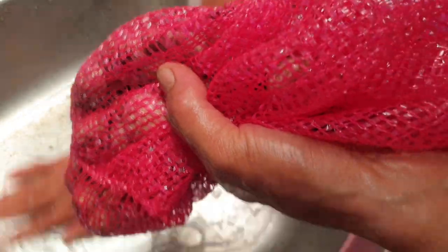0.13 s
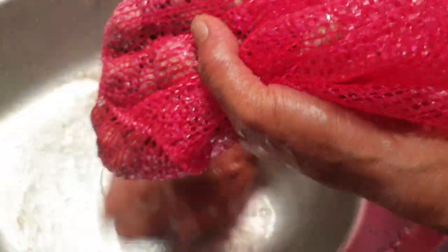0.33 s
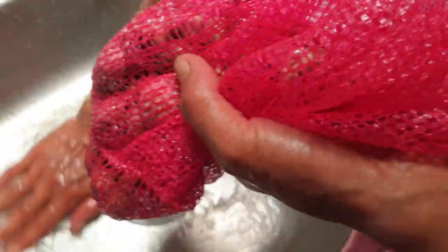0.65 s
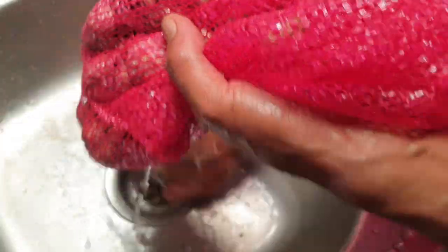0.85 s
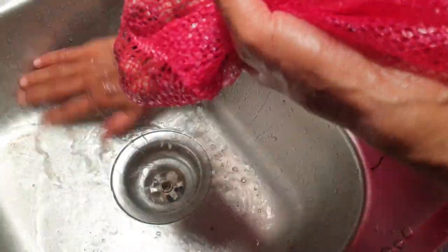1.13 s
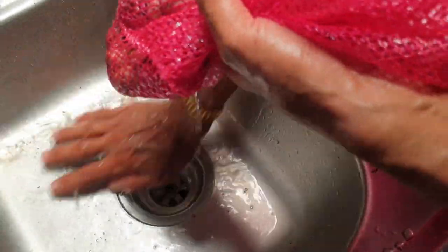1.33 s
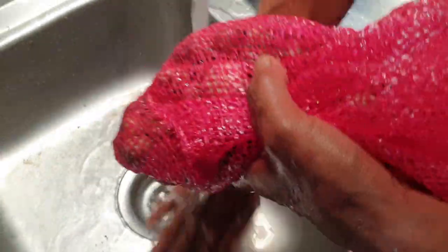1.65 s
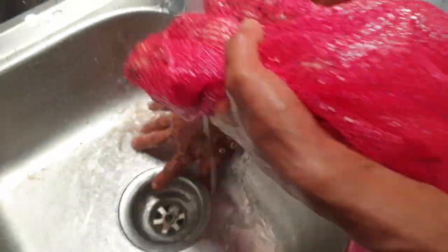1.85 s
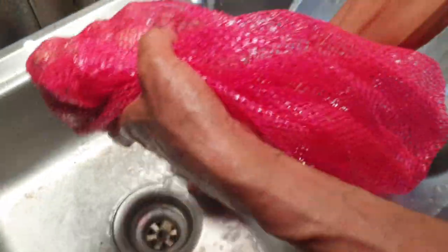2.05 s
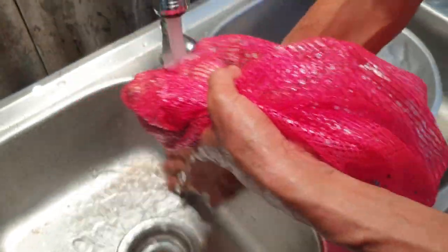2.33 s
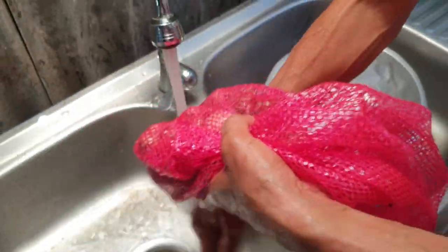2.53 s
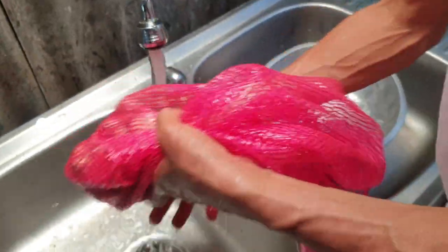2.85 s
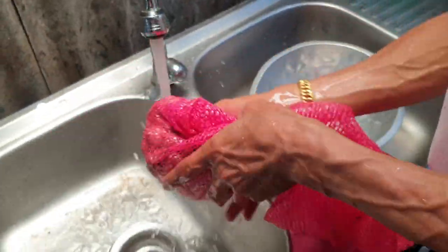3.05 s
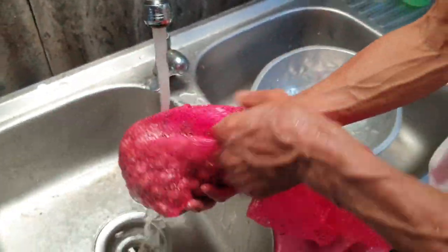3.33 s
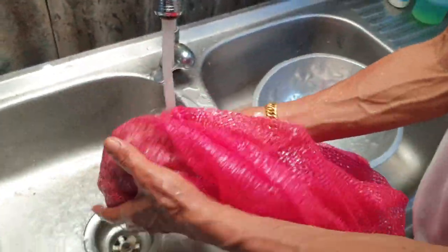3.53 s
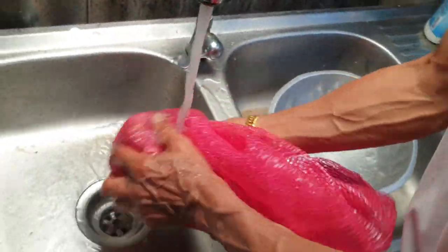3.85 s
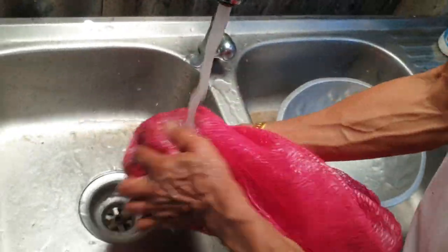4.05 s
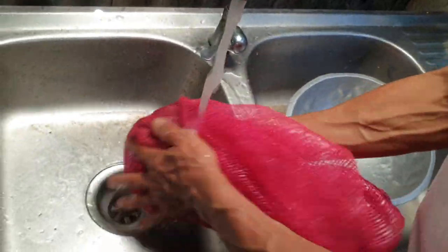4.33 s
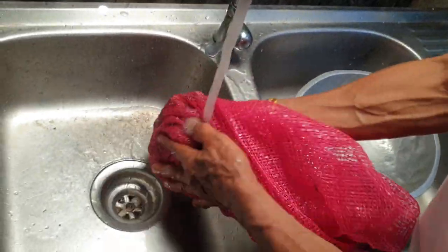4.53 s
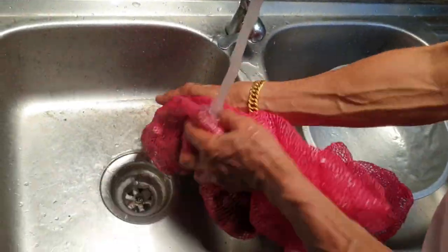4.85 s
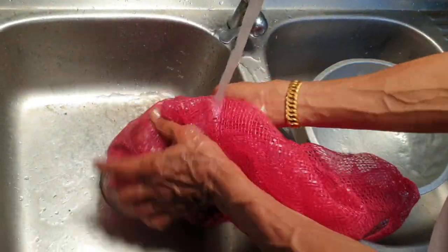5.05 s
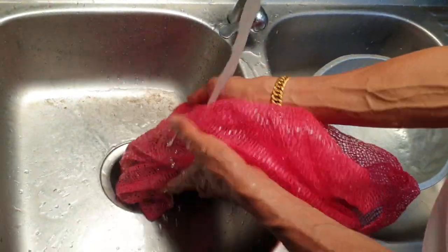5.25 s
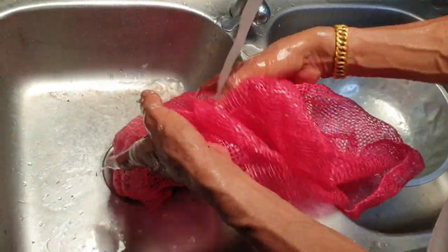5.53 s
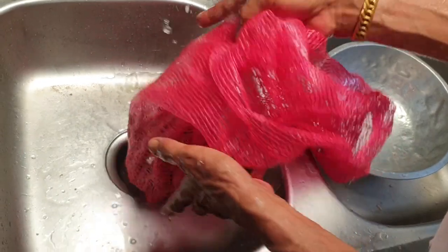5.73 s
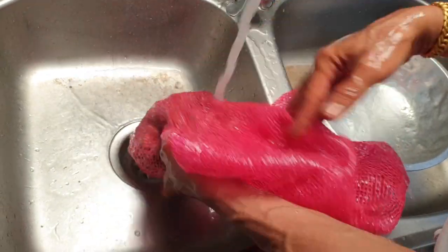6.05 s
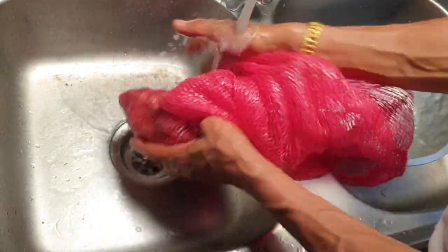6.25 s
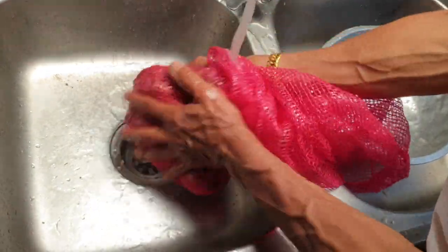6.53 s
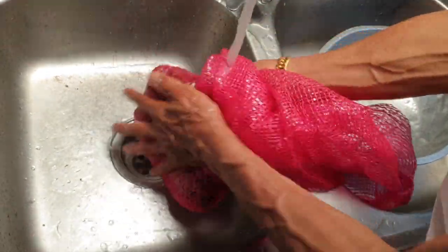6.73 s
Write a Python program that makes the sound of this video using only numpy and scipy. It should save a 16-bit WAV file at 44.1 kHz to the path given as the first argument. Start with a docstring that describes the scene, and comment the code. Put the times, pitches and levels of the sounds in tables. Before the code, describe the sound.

Tap water hisses and gurgles steadily into a steel sink while hands slap and knead a wet mesh bag, bumping the hollow basin.

```python
"""Tap over a mesh bag in a steel sink

A tap runs over a mesh bag while hands knead the bag and sweep the basin: patchy noise and damped bubble sines
hiss, fizz and gurgle, and noise puffs are sheets of water slapping down. Knuckles and the bag bump the steel:
damped modes boom and clank, with a wet noise thud. Squeaks, drumming, a fine hiss and a rumble fill in.
A two-port microphone turns, so the water's lag between the ports drifts; the boom reaches both nearly alike."""
import sys
import numpy as np
from scipy import signal
from scipy.fft import rfft, irfft, next_fast_len
from scipy.io import wavfile
from scipy.ndimage import uniform_filter1d, map_coordinates

SR = 44100
rng = np.random.default_rng(int(sys.argv[2]) if len(sys.argv) > 2 else 0)


def to_wav(sig):
    """Store sig (one row per channel, or 1-D mono) as 16-bit WAV at the path in sys.argv[1].

    Samples outside -1..1 are clipped; the rate is SR.
    """
    pcm = np.clip(np.atleast_2d(sig), -1, 1) * 32767
    pcm = np.round(pcm).astype(np.int16)
    wavfile.write(sys.argv[1], SR, pcm.T)  # frames by channels


N = 303494


def amp(db):
    """dB to gain."""
    return 10 ** (np.asarray(db) / 20)


def unit(x):
    """Scaled to rms 1."""
    return x / np.sqrt(np.mean(x ** 2) + 1e-20)


def along(points, hz):
    """Value at hz from (Hz, value) points on a log axis."""
    f, v = np.transpose(points)
    return np.interp(np.log(hz + 1), np.log(f + 1), v)


def curves(rows):
    """One value per sample for each column after the time."""
    s, *cols = np.transpose(rows)
    return [np.interp(np.arange(N) / SR, s, c) for c in cols]


def wobble(rate):
    """A smooth random curve, rate knots a second."""
    return map_coordinates(rng.standard_normal(int(N * rate / SR) + 4), [np.arange(N) * rate / SR])


def filtered(x, response):
    """x times a complex response of frequency."""
    m = next_fast_len(N + SR // 2)
    return irfft(rfft(x, m) * response(np.fft.rfftfreq(m, 1 / SR)), m)[..., :N]


# How alike the two ports hear a wide sound. Each row: frequency in Hz, left-right likeness (1 = identical).
PORT_LIKENESS = [(100, .98), (400, 0.92), (800, 0.47), (1500, 0.067), (3000, 0.44), (6000, 0.14),
                 (12000, 0.04)]


def ports(pair):
    """Two unrelated signals mixed so that left and right are as alike as the ports hear them."""
    turn = lambda hz: np.arccos(np.clip(along(PORT_LIKENESS, hz), -1, 1)) / 2
    mid, side = filtered(pair, lambda hz: np.array([np.cos(turn(hz)), np.sin(turn(hz))]))
    return np.array([mid + side, mid - side])


# Running water between slaps, before surges and colouring.
# Each row: time in seconds, stream level in dB, spray level in dB, gurgle level in dB.
WATER_LEVELS = [(0.0, -32.5, -35.5, -43.5), (0.3, -29.5, -30, -36.5), (0.65, -33, -40.5, -38.5),
                (0.97, -32, -37, -38.5), (1.15, -33.5, -40, -41), (1.5, -33.5, -39.5, -37.5),
                (1.7, -31, -36.5, -39.5), (1.88, -31.5, -33, -41.5), (2.03, -33, -40.5, -49),
                (2.25, -31.5, -38, -45), (2.6, -34, -42.5, -40.5), (3.1, -35, -44, -43),
                (3.58, -35, -40, -42), (4.27, -34, -39.5, -38.5), (4.8, -33, -38, -36),
                (5.6, -34.5, -40.5, -40.5), (6.3, -34, -38, -39.5), (6.88, -34, -41, -38.5)]
# Colour of the broad hiss. Each row: frequency in Hz, relative density in dB per Hz.
STREAM_COLOUR = [(1180, -48), (2000, -5.5), (2740, -3), (2950, -9), (3170, -4.5), (3710, -0.5), (4210, 0.5),
                 (5170, -0.5), (6130, 0.5), (8500, -12), (11000, -20), (18700, -120)]
# Colour of the fine fizz. Each row: frequency in Hz, relative density in dB per Hz.
SPRAY_COLOUR = [(4000, -41), (6500, -2), (8400, -10), (10000, -7.5), (11900, -4), (13500, -10),
                (15900, -13.5)]
# Colour of the low burble. Each row: frequency in Hz, relative density in dB per Hz.
GURGLE_COLOUR = [(350, -48), (600, -15.5), (650, -11), (812, -2), (1070, -7.5), (1190, -4), (1370, -7.5),
                 (1550, -1.5), (1800, -0.5), (1950, -3.5), (3000, 0.5), (3900, -1), (6600, -120)]
STREAM_SHARE, GURGLE_SHARE = .35, 0.37  # how much of a shower's lift these layers follow


def water():
    """Stream, spray and gurgle surge together under the slaps, and reach the two ports at different times."""
    stream_db, spray_db, gurgle_db = curves(WATER_LEVELS)
    surge, shower_db = wobble(24), showers()
    stream_bubbles = bubbles(count=12000, hz=4487, spread=0.3845, cycles=9.35, size_db=4.0)
    stream = layer(STREAM_COLOUR, 2.23, 2.1, stream_bubbles, -12.0)
    spray_bubbles = bubbles(count=12000, hz=10750, spread=0.33, cycles=1.7, size_db=8.0)
    spray = layer(SPRAY_COLOUR, 1.8, 0.25, spray_bubbles, -14.5)
    gurgle_bubbles = bubbles(count=4000, hz=1667, spread=0.408, cycles=3.52, size_db=3.0)
    gurgle = layer(GURGLE_COLOUR, 1.45, 2.8, gurgle_bubbles, -14.0)

    stream_gain = amp(stream_db + STREAM_SHARE * shower_db + 0.21 * surge)
    gurgle_gain = amp(gurgle_db + GURGLE_SHARE * shower_db + 1.1 * surge)
    wet = pockets(stream_gain * stream + gurgle_gain * gurgle)
    spray_gain = amp(spray_db + shower_db + 1.13 * surge + 0.32 * wobble(60))
    wet += spray_gain * spatter(count=120, life=0.015) * spray + slaps()
    return turning_microphone(wet)


def layer(spectrum, patchy_db, streak_db, grains, grain_db):
    """Patchy noise and bubbles, coloured together, rms 1."""
    mix = rush(patchy_db, streak_db) + amp(grain_db) * grains
    return unit(filtered(ports(mix), lambda hz: amp(along(spectrum, hz))))


def rush(patchy_db, streak_db):
    """Two noises with broad short patches and narrow long streaks of random gain."""
    z = signal.stft(rng.standard_normal((2, N)), nperseg=512)[2]
    chance = rng.standard_normal((2,) + z.shape[1:])
    patches = uniform_filter1d(uniform_filter1d(chance[0], size=5, axis=0), size=8, axis=1)
    streaks = uniform_filter1d(chance[1], size=50, axis=1)
    gain = amp(patchy_db * unit(patches) + streak_db * unit(streaks))
    return unit(signal.istft(z * gain, nperseg=512)[1][:, :N])


def bubbles(count, hz, spread, cycles, size_db):
    """Two streams of short damped sines that rise in pitch, a few much louder than most."""
    when, port = rng.random((2, count, 1))
    pitch = np.clip(hz * np.exp(spread * rng.standard_normal((count, 1))), 300, 15000)
    k = np.arange(256)
    turns = pitch * k / SR
    rising_sine = np.sin(2 * np.pi * turns * (1 + 0.1103 * turns / cycles))
    grain = rising_sine * np.exp(-turns / cycles) * (1 - np.exp(-turns))
    grain = grain * amp(size_db * np.minimum(rng.exponential(size=(count, 1)), 3.5))
    # both ports lie end to end in one long buffer
    where = (when * N).astype(int) + k + (port > .5) * (N + 256)
    return unit(np.bincount(where.ravel(), grain.ravel(), 2 * (N + 256)).reshape(2, -1)[:, :N])


# Air pockets between bag, hands and steel that colour the hiss.
# Each row: time in seconds, low peak in Hz, high peak in Hz, tilt in dB per octave (from 1500 to 8000 Hz).
AIR_POCKETS = [(0.0, 4500, 5330, -0.5), (0.5, 3800, 5600, 1), (0.9, 4500, 5730, 0.5), (1.3, 3970, 5400, -2),
               (1.55, 3980, 6100, 0), (2.05, 4600, 5860, -4), (2.53, 4030, 5860, 0.2),
               (3.2, 4200, 6200, 0.5), (4.16, 3800, 6200, 0.5), (4.5, 3930, 6600, 2),
               (5.46, 3650, 6200, -0.5), (5.88, 4000, 6100, -0.7), (6.88, 4060, 6000, 1)]
# High steel modes that sing with the falling water.
# Each row: centre in Hz, half-width in Hz, lift in dB at full strength (negative = a dip).
SINGING_MODES = [(1780, 170, 2), (2240, 11, 2), (2980, 19, 10.5), (3260, 36, 4), (3680, 18.4, 10),
                 (4130, 73, 4), (5450, 44, 1.5), (6250, 20, -9)]
# How strongly the steel modes sing over time, fullest from 3.7 s on.
# Each row: time in seconds, share of the lift.
SINGING_STRENGTH = [(0, 0.36), (2.2, 0.28), (3.7, 1), (6.88, 1)]


def pockets(x):
    """Drifting air pockets and steel modes shape bands of the hiss; close walls ripple it, each port its own way."""
    hz, t, z = signal.stft(x, SR, nperseg=1024)
    s, *columns = np.transpose(AIR_POCKETS)
    low_hz, high_hz, tilt_db = [np.interp(t, s, c) for c in columns]
    singing = np.interp(t, *np.transpose(SINGING_STRENGTH))
    peaks = [(low_hz, 250, 2.5), (high_hz, 350, 3)]
    peaks += [(c, w, db * singing) for c, w, db in SINGING_MODES]
    lift_db = sum(db / (1 + ((hz[:, None] - centre_hz) / width_hz) ** 2) for centre_hz, width_hz, db in peaks)
    lift_db += tilt_db * np.log2(np.clip(hz[:, None], 1500, 8000) / 4200)
    ripple = uniform_filter1d(rng.standard_normal(z.shape), size=2, axis=1)
    ripple_db = 3.1 * unit(uniform_filter1d(ripple, size=40, axis=2))
    return signal.istft(z * amp(lift_db + ripple_db), SR, nperseg=1024)[1][:, :N]


def spatter(count, life):
    """Gain of the spray: small droplet showers that start at once and die away over life seconds (to 1/e)."""
    when, size = rng.random((2, count))
    starts = np.bincount((when * N).astype(int), size ** 2, N)
    return 1 + 2.05 * signal.fftconvolve(starts, np.exp(-np.arange(2048) / SR / life))[:N]


# Sheets of water slapping down, each with its shower.
# Each row: start in seconds, slap level in dB, slap centre in Hz, shower lift over the spray in dB.
WATER_SLAPS = [(0.03, -39, 5240, 6.5), (0.0625, -27, 5240, -3), (0.155, -26, 4290, -5),
               (0.2433, -29, 4160, -3.5), (0.3185, -23, 5730, -2.5), (0.4188, -29, 5360, 7),
               (0.48, -32, 5000, 5), (0.526, -33, 3500, 2.5), (0.626, -27.5, 5640, 2.5),
               (0.71, -26, 6220, 5.5), (0.789, -34, 5700, 5.5), (0.849, -34, 5680, 6.5),
               (0.913, -25, 6300, 5), (0.9544, -21, 5930, 4), (1.0214, -34, 4770, 3),
               (1.147, -33, 6200, 6.5), (1.18, -25, 6160, 0), (1.25, -36, 5500, 1), (1.358, -36, 5250, 1),
               (1.601, -27, 5920, 6), (1.6945, -36, 4040, 7), (1.8033, -17.5, 6460, 13),
               (2.125, -31, 4320, -1.5), (2.255, -28.5, 6110, 4.5), (2.3765, -32, 5430, -0.5),
               (2.42, -32, 5430, -1), (2.6908, -38, 5330, 6.5), (2.7482, -23, 3950, 8),
               (2.843, -26, 4200, 8.5), (2.947, -29, 6850, -2), (2.9725, -29, 6220, 10),
               (3.06, -35, 4570, 7.5), (3.098, -31, 5500, 6.5), (3.125, -53, 6500, -1),
               (3.266, -32, 4350, 7), (3.71, -29, 6400, 3), (3.999, -37, 5000, 6), (4.0991, -30, 3720, 1.5),
               (4.514, -29, 4110, 2), (4.72, -22.5, 3800, 0), (4.84, -38, 4500, 6), (5.328, -32, 3690, -1),
               (5.589, -31, 3110, -0.5), (5.68, -33, 4090, 2.5), (6.2248, -35, 4110, -6),
               (6.3753, -26, 5340, 6), (6.6395, -19, 4600, 4.5), (6.861, -34, 4500, 5.5)]
SLAP_T60_S = 0.077
SHOWER_PEAK_S, SHOWER_RISE_S, SHOWER_FALL_S = 0.0085, 0.012, 0.045  # peak after the slap, swell, fade


def slaps():
    """Each sheet of water is a broad puff of noise with a fast rise."""
    out, t = np.zeros((2, N + SR)), np.arange(8192) / SR
    hz = np.fft.rfftfreq(len(t), 1 / SR)
    for s, db, centre_hz, _ in WATER_SLAPS:
        colour = amp(-6.5 * np.log2((hz + 50) / centre_hz) ** 2)
        puff = unit(irfft(rfft(rng.standard_normal((2, len(t)))) * colour))
        envelope = amp(db - 60 * t / SLAP_T60_S) * (1 - np.exp(-t / 0.001))
        out[:, round(s * SR):][:, :len(t)] += envelope * puff
    return ports(out[:, :N])


def showers():
    """Lift of the spray in dB: it swells (or dips, if negative) around every slap and relaxes after it."""
    t = np.arange(0, N / SR, .002)
    s, _, _, lift_db = np.transpose(WATER_SLAPS)[:, :, None]
    u = t - s - SHOWER_PEAK_S
    shape = np.where(u < 0, np.exp(-(u / SHOWER_RISE_S) ** 2), np.exp(-np.abs(u) / SHOWER_FALL_S))
    return np.interp(np.arange(N) / SR, t, np.sum(lift_db * shape, axis=0))


# The water's lag as the microphone turns.
# Each row: time in seconds, lag of the left port in samples (negative = left is moved earlier).
LEFT_LAG = [(0, -15), (1.4, -14), (1.7, -7.5), (2.3, -6), (2.7, -8.5), (3.1, -4), (4.2, -2), (6.88, -2)]


def turning_microphone(wet):
    """The path to the left port changes length as the microphone turns, so its water shifts in time."""
    lag, = curves(LEFT_LAG)
    left = map_coordinates(wet[0], [np.arange(N) - lag], mode="nearest")
    return np.array([left, wet[1]])


# Modes of the steel basin. Each row: frequency in Hz, relative level in dB, undamped t60 in seconds.
BASIN_MODES = [(67, -22, 0.29), (100, 4.5, 0.2), (124.4, -3, 0.38), (164.6, -1.5, 0.36), (189, -5, 0.51),
               (260.2, -4, 0.55), (336.8, 6, 0.12), (366.8, -3, 0.48), (385.8, 2, 0.25), (438.3, -8, 0.58),
               (525, -1.5, 0.43), (622.3, -1, 0.41), (699.4, 3, 0.27), (769, 6.5, 0.29), (830, 6, 0.1),
               (951, 3.5, 0.25), (1057, 7, 0.16), (1200, -4, 0.75), (1345, 6, 0.24), (1470, 1, 0.58)]
# Bumps on the steel. Each row: start in seconds, boom level in dB, boom centre in Hz, ring level in dB,
# clank level in dB, clank centre in Hz, damping by the hand (1 = free); levels come before each mode's own.
STEEL_BUMPS = [(0.019, -36, 181, -46, -46, 1500, 1.1), (0.224, -28, 193, -44, -49.5, 756, 1.45),
               (0.389, -29.5, 139, -42, -49, 795, 0.72), (0.439, -30, 178, -33.5, -42, 696, 2.1),
               (0.755, -25.5, 192, -40, -44, 754, 0.86), (0.909, -32, 96.9, -42, -52.5, 1050, 0.72),
               (0.953, -16.5, 110, -36, -39.5, 785, 1.8), (1.099, -21.5, 110, -54, -39.5, 684, 3.4),
               (1.138, -22.5, 124, -60, -44, 1570, 1.6), (1.165, -25, 148, -24, -23, 900, 2.9),
               (1.199, -30, 186, -30, -39, 700, 1.74), (1.429, -35.5, 188, -64, -53.5, 1450, 2),
               (1.553, -28, 189, -38.5, -44.5, 1520, 1), (1.639, -40, 161, -41.5, -54, 774, 0.83),
               (1.775, -21, 113, -40, -44.5, 1200, 1.2), (1.799, -33, 197, -37, -41.5, 514, 1.14),
               (1.859, -31, 98, -41.5, -46, 816, 1.24), (2.33, -36, 92, -55.5, -61, 1560, 0.84),
               (2.706, -48.5, 95, -46, -66, 1570, 0.29), (2.8, -45.5, 172, -42, -58, 1450, 0.74),
               (2.908, -41, 91.5, -44.5, -48, 1210, 1.7), (3.082, -31.5, 205, -34.5, -52, 501, 3.4),
               (3.099, -33, 91.5, -38, -54, 552, 1.9), (3.321, -55, 153, -44.5, -62, 848, 0.99),
               (3.808, -42, 147, -37, -44, 527, 0.97), (3.986, -42, 132, -43.5, -49.5, 590, 0.74),
               (4.228, -41.5, 93.5, -43.5, -50, 773, 1.2), (4.468, -37, 124, -43, -55, 840, 0.36),
               (4.515, -26, 189, -34, -43, 970, 1.53), (4.68, -14.5, 105, -32, -43.5, 780, 1.3),
               (4.719, -20.5, 175, -29.5, -28.5, 1360, 2.7), (4.761, -34.5, 81, -28.5, -40, 748, 4.1),
               (4.853, -13.5, 169, -20.5, -31.5, 980, 2.65), (4.877, -14.5, 99, -30, -36, 543, 2.5),
               (4.927, -32, 134, -33, -34, 503, 1.8), (5.078, -50, 120, -53, -41.5, 1230, 3.7),
               (5.175, -23.5, 101, -34.5, -42.5, 630, 1.3), (5.279, -27.5, 99.6, -52, -56, 856, 1.2),
               (5.369, -29, 173, -35.5, -26, 730, 1.83), (5.674, -37, 115, -54.5, -72, 799, 0.73),
               (5.832, -36.5, 92, -63, -47, 1460, 0.59), (6.052, -20.5, 102, -32.5, -37, 540, 1.07),
               (6.373, -14, 144, -30.5, -33, 1040, 1.24), (6.395, -17, 102, -25.5, -33.5, 785, 1.09),
               (6.614, -29, 99.6, -39, -42, 1560, 0.6), (6.849, -28.5, 170, -37.5, -40, 1030, 1.5)]
RING_HZ, RING_SINKS_HZ = 367, 50.7  # centre of the free ring, its fall per step of damping
RING_NARROW_DB = 96  # loss an octave off centre for a free ring; a damping hand widens it
THUD_DB, THUD_T60_S, THUD_WIDTH_HZ = -3, .26, 450  # wet thud relative to the clank; damping shortens it
THUD_PER_BOOM = .45  # the more boom over clank, the more the soft wet bag is heard
ATTACK_CYCLES, THUD_ATTACK_S = 0.54, .002  # rise of each mode and of the thud


def bumps():
    """Every bump rings the basin modes at new strengths; where it lands picks boom and clank, plus a wet thud."""
    out, t = np.zeros(N + SR), np.arange(SR // 2) / SR
    hz, level_db, t60 = np.transpose(BASIN_MODES)[:, :, None]
    grid_hz = np.fft.rfftfreq(len(t), 1 / SR)
    for s, boom_db, boom_hz, ring_db, clank_db, clank_hz, damping in STEEL_BUMPS:
        low_db = boom_db - 12 * np.log2(hz / boom_hz) ** 2
        ring_hz = RING_HZ - RING_SINKS_HZ * (damping - 1)
        mid_db = ring_db - RING_NARROW_DB / damping ** 2 * np.log2(hz / ring_hz) ** 2
        high_db = clank_db - 22 * np.log2(hz / clank_hz) ** 2
        part_db = np.where(hz < 230, low_db, np.where(hz < 500, mid_db, high_db))
        strength_db = level_db + part_db + 2.0 * rng.standard_normal(hz.shape)
        gain = amp(strength_db - 60 * t * damping / t60)
        detune = 1 + 0.0193 * rng.standard_normal(hz.shape)
        # the phase of each mode wanders at random, the high ones most
        wander_step = .004 + .024 * np.clip(hz / 300 - 1.2, 0, 1)
        wander = wander_step * np.cumsum(rng.standard_normal(gain.shape), axis=1)
        attack = 1 - np.exp(-t * hz / ATTACK_CYCLES)
        ring = np.sum(gain * attack * np.sin(2 * np.pi * hz * detune * t + wander), axis=0)

        colour = 1 / (1 + ((grid_hz - clank_hz) / THUD_WIDTH_HZ) ** 2) * grid_hz / (grid_hz + 300)
        thud = unit(irfft(rfft(rng.standard_normal(len(t))) * colour))
        thud_db = clank_db + THUD_DB + THUD_PER_BOOM * (boom_db - clank_db)
        thud_gain = amp(thud_db - 60 * t * damping / THUD_T60_S) * (1 - np.exp(-t / THUD_ATTACK_S))
        out[round(s * SR):][:len(t)] += ring + thud_gain * thud
    return out[:N]


# Wet skin squeaking on the steel. Each row: start in seconds, level in dB, pitch in Hz, hold in seconds.
SKIN_SQUEAKS = [(.774, -24.5, 746, 0.052), (5.383, -31, 710, 0.042)]


def squeaks():
    """Stick-slip holds one pitch with a rougher octave and a weak third harmonic, then lets go."""
    out, t = np.zeros(N + SR), np.arange(SR // 4) / SR
    for s, db, pitch_hz, held in SKIN_SQUEAKS:
        phase = 2 * np.pi * pitch_hz * t + 0.032 * np.cumsum(rng.standard_normal(len(t)))
        let_go = 1 / (1 + np.exp((t - held) / 0.0023))
        hold = (1 - np.exp(-t / 0.0018)) * (0.54 * np.exp(-t / 0.077) + let_go)
        roughness = 0.052 * np.cumsum(rng.standard_normal(len(t)))
        tone = np.sin(phase) + 0.5 * np.sin(2 * phase + roughness) + 0.17 * np.sin(3 * phase)
        out[round(s * SR):][:len(t)] += amp(db) * hold * tone
    return out[:N]


# Water and hands drumming the basin. Each row: time in seconds, boom level in dB, ring level in dB.
DRUM_LEVELS = [(0.0, -41, -44.5), (0.45, -40.5, -49.5), (0.8, -44, -54), (1.1, -38.5, -50),
               (1.45, -51, -58), (1.78, -42, -49), (2.1, -55, -59), (2.32, -47.5, -53), (2.7, -53, -68),
               (3.0, -59, -54), (3.5, -55, -58.5), (4.3, -51, -52.5), (4.6, -56, -53), (4.75, -31, -50),
               (4.83, -34, -48), (4.92, -36.5, -48), (5.19, -47, -55), (5.42, -39.5, -49),
               (5.85, -52.5, -69), (6.3, -46, -70), (6.65, -38.5, -44.5), (6.88, -48, -52)]
DRUM_CLANK_DB, DRUM_CLANK_FOLLOWS = -58, 1  # mean level of the clank modes; share of the ring's swings they follow


def drumming():
    """Uneven noise drives the basin modes below 900 Hz without pause, in three groups."""
    out = 0
    groups_hz = [(0, 230), (230, 500), (500, 900)]
    boom_db, ring_db = curves(DRUM_LEVELS)
    clank_db = DRUM_CLANK_DB + DRUM_CLANK_FOLLOWS * (ring_db - ring_db.mean())
    for level_db, (lo, hi) in zip((boom_db, ring_db, clank_db), groups_hz):
        # 4.6 / t60 serves as each resonance's width in Hz
        modes = [(c, db, 4.6 / t60) for c, db, t60 in BASIN_MODES if lo <= c < hi]
        body = lambda f: sum(amp(db) * 1j * f * w / (c * c - f * f + 1j * f * w) for c, db, w in modes)
        push = amp(3.5 * wobble(25)) * rng.standard_normal((2, N))
        out = out + amp(level_db) * unit(filtered(push, body))
    return ports(out)


def fine_hiss():
    """A steady fine spray hiss, heard only in the top treble."""
    rise = lambda hz: 1 / (1 + (12500 / (hz + 1)) ** 6)
    return amp(-51) * unit(filtered(rng.standard_normal((2, N)), rise))


# Colour of the room rumble. Each row: frequency in Hz, relative density in dB per Hz.
RUMBLE_COLOUR = [(25, -22), (45, 8), (62, 13.5), (100, 1), (160, 2), (250, -28), (500, -21), (900, -54)]


def room():
    """A steady low rumble of coloured noise under everything."""
    noise = ports(rng.standard_normal((2, N)))
    return amp(-48.5) * unit(filtered(noise, lambda hz: amp(along(RUMBLE_COLOUR, hz))))


def scene():
    """The clanks reach the right port by other paths than the left: directly and off two walls of the basin."""
    steel = bumps() + squeaks()

    def right_paths(hz):
        """Two wall echoes grow up to 600 Hz, and the phase slips away from the left with pitch."""
        echoes = 0.26 * np.exp(-.011j * hz) - 0.19 * np.exp(-.024j * hz)
        walls = 1 + np.clip(hz / 600, 0, 1) ** 2 * echoes
        return walls * np.exp(-1j * np.clip(hz / 850, 0, 1.4) ** 2)

    right_steel = filtered(steel, right_paths)
    return np.array([steel, right_steel]) + drumming() + water() + fine_hiss() + room()


# Colour difference of the ports. Each row: frequency in Hz, left minus right in dB.
PORT_LEAN = [(60, 2), (110, 1.5), (200, 1.5), (380, 2.5), (700, -1.5), (1290, -1.5), (2380, -1), (4400, -5),
             (8120, -4), (15000, -1.5)]
TOP_HZ = 15900  # top of the band


def record(dry):
    """The ports differ in colour; the deepest bass is weakened and nothing sounds above TOP_HZ."""
    lean = lambda hz: amp(np.array([[.5], [-.5]]) * along(PORT_LEAN, hz))
    bass_loss = lambda hz: (1j * hz / 55 / (1 + 1j * hz / 55)) ** 2
    return filtered(dry, lambda hz: lean(hz) * (hz < TOP_HZ) * bass_loss(hz))


dry = scene()
out = record(dry)
to_wav(out)
```